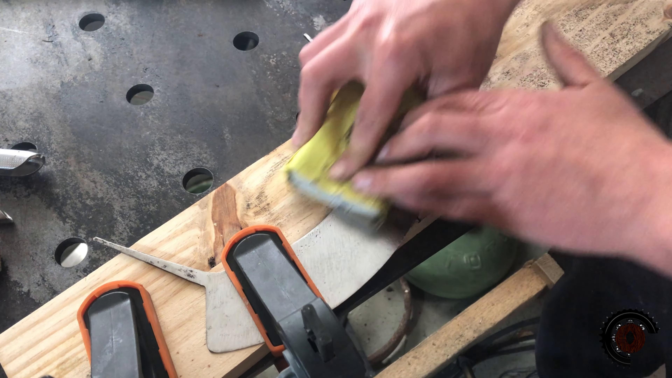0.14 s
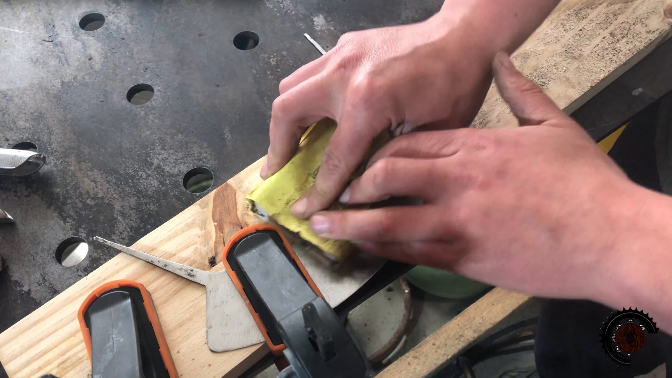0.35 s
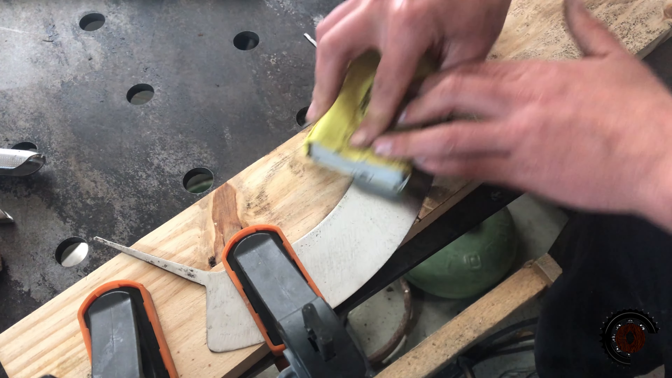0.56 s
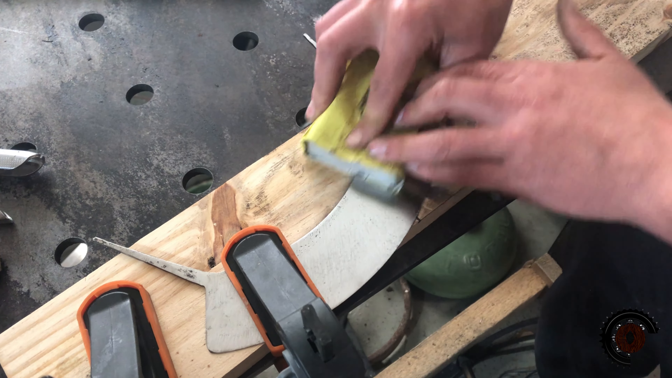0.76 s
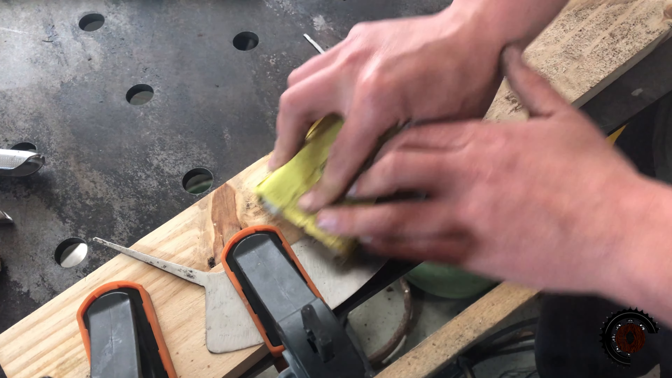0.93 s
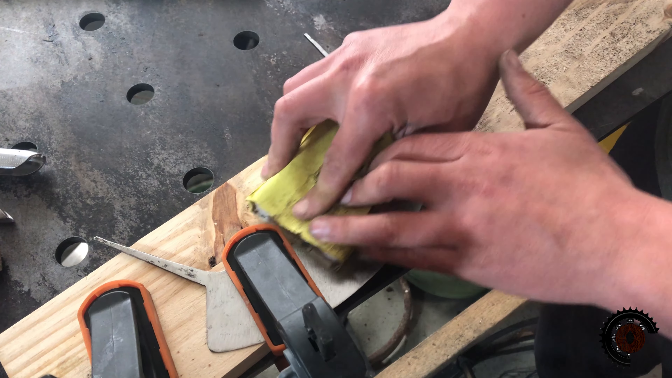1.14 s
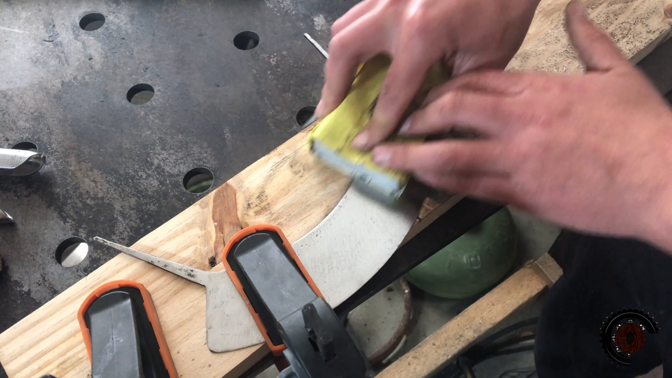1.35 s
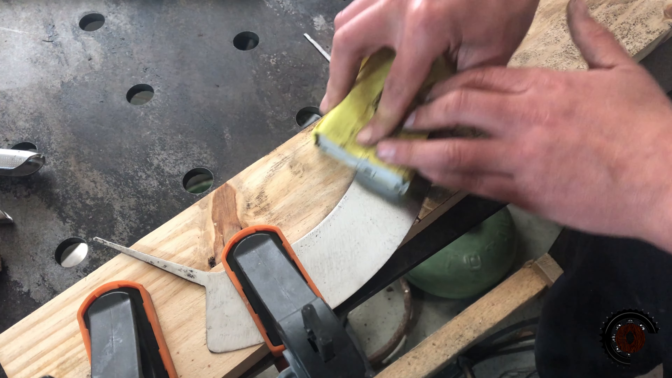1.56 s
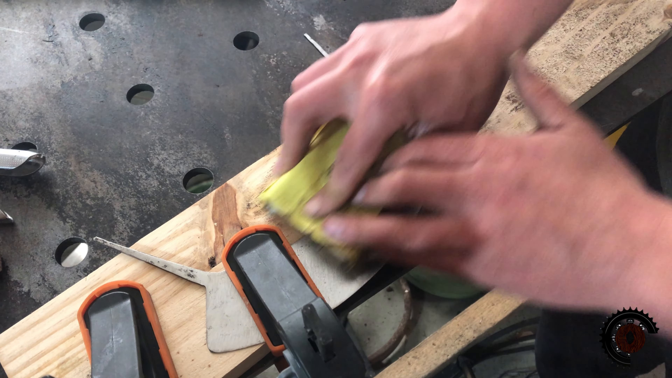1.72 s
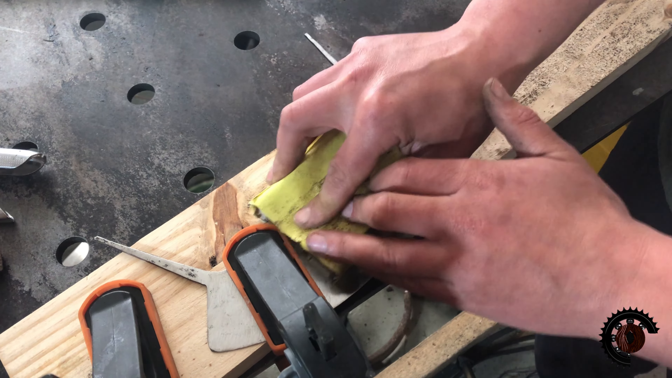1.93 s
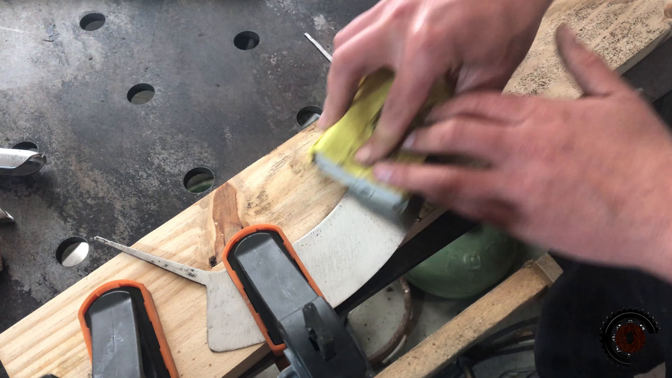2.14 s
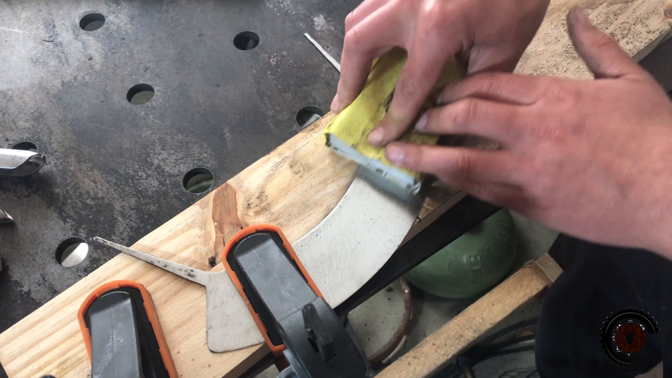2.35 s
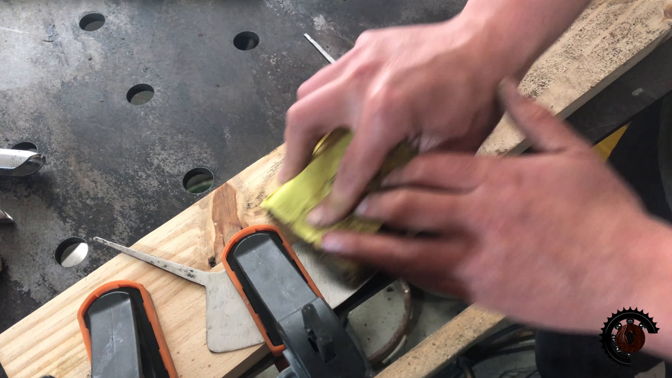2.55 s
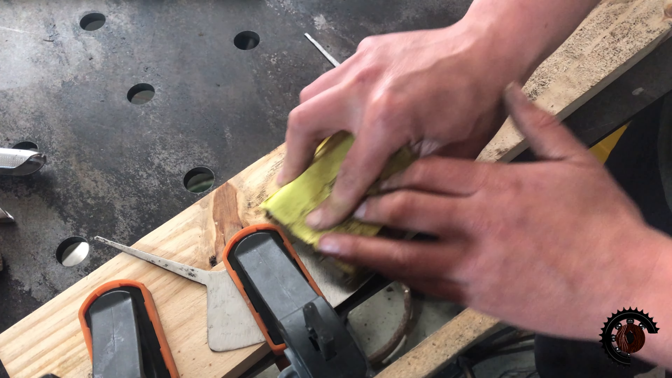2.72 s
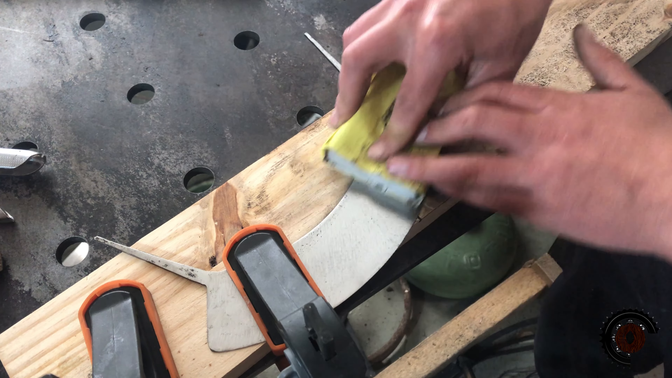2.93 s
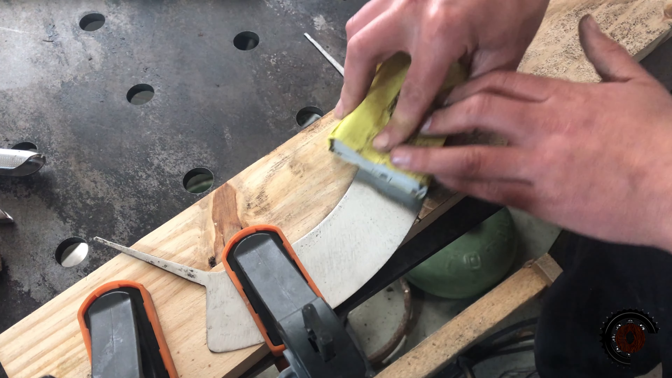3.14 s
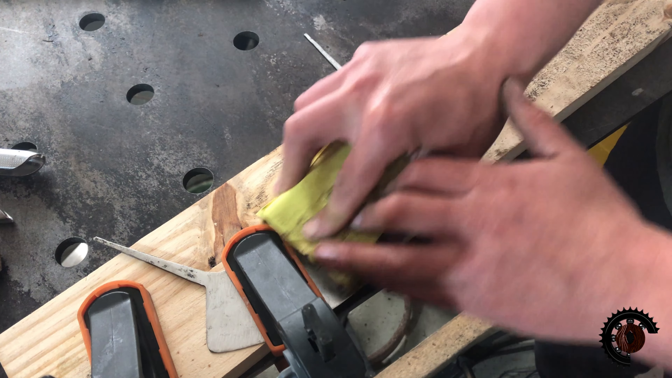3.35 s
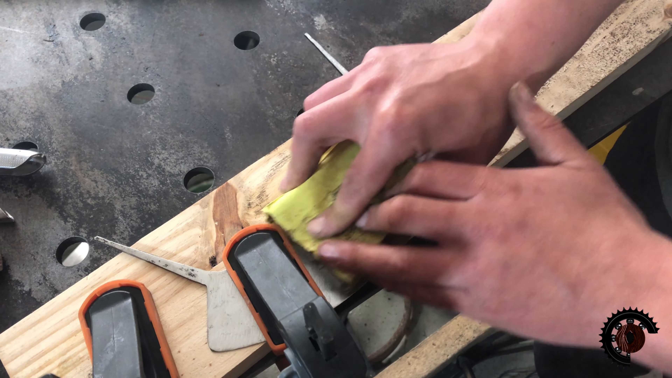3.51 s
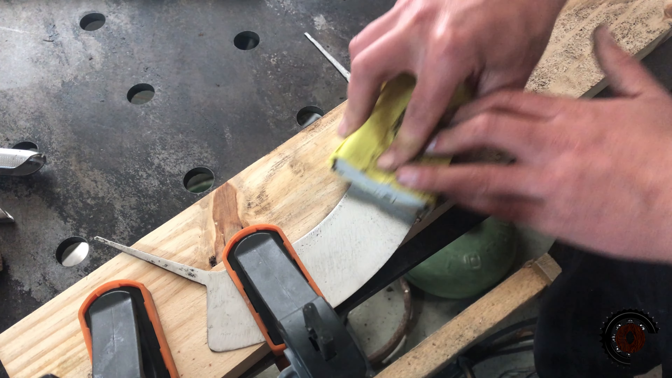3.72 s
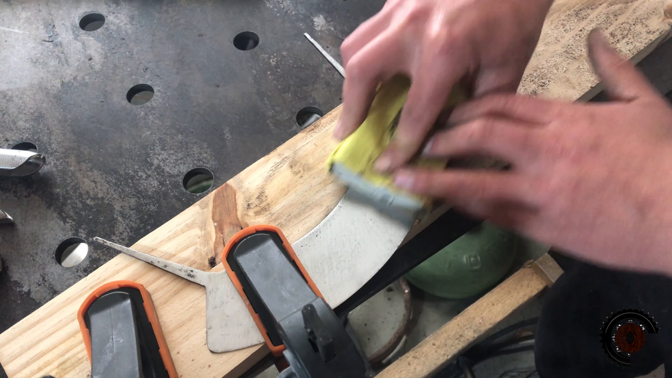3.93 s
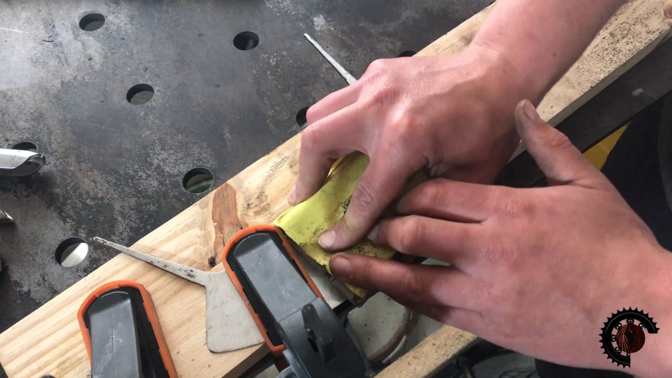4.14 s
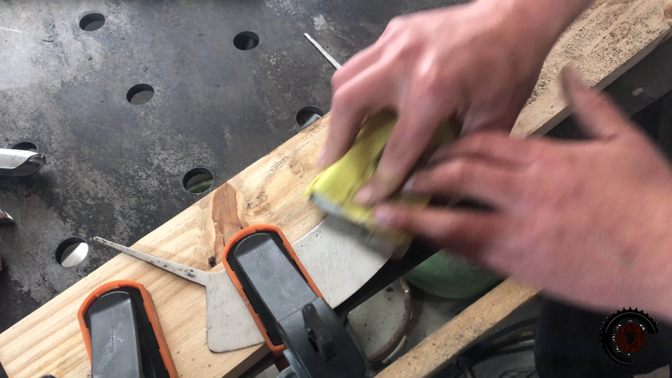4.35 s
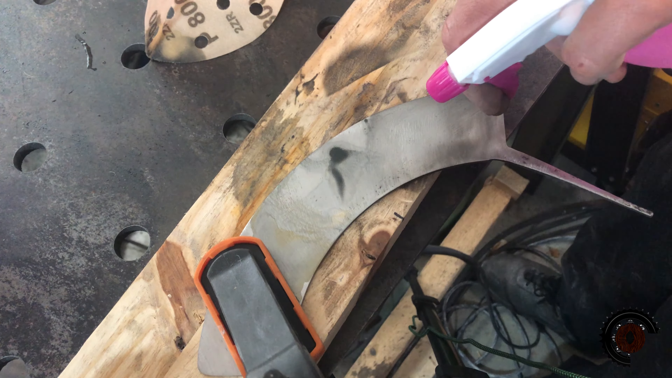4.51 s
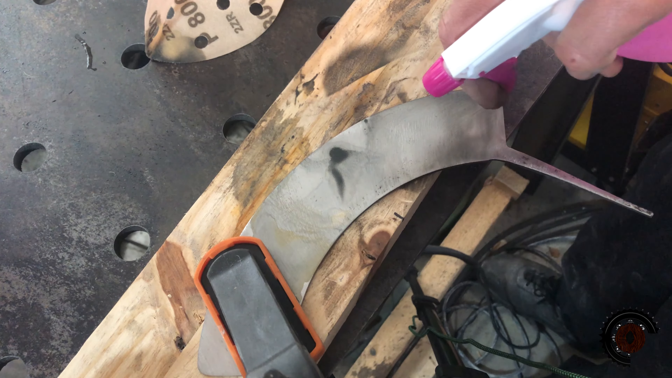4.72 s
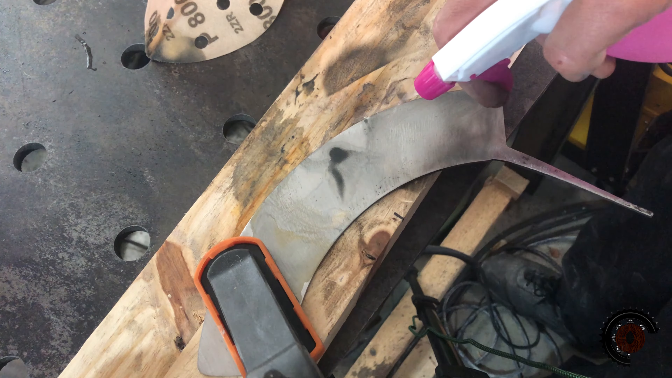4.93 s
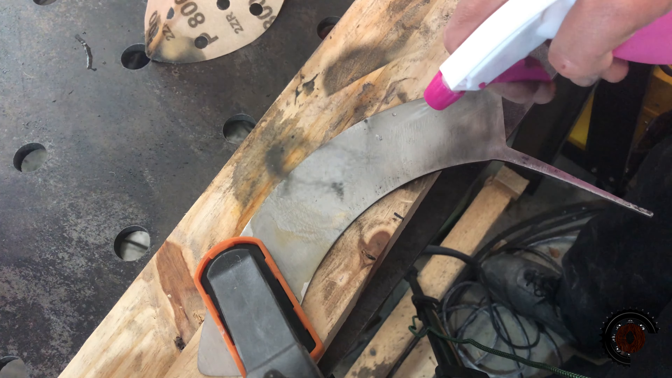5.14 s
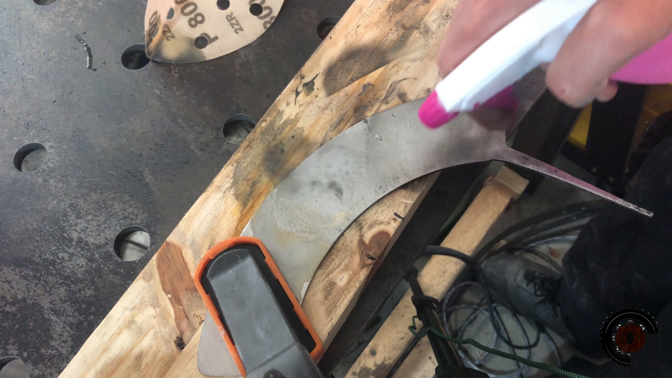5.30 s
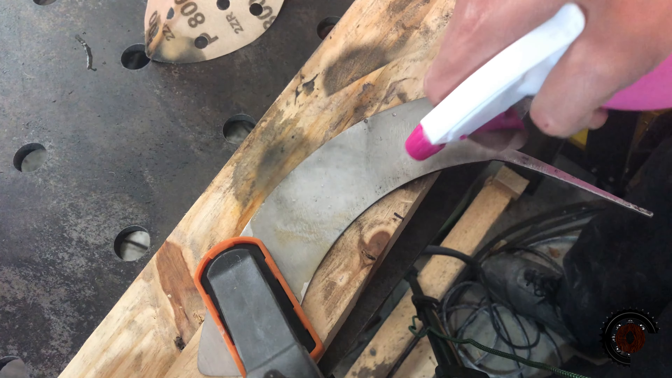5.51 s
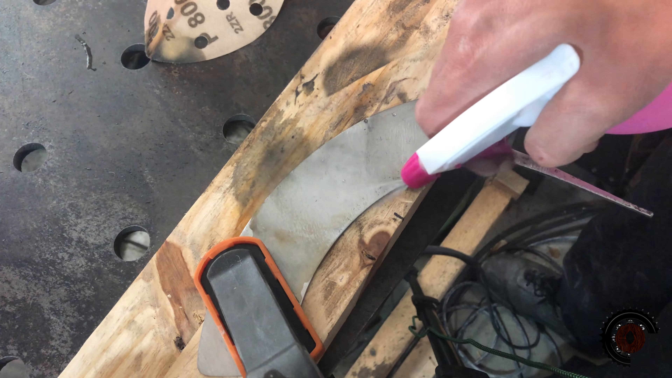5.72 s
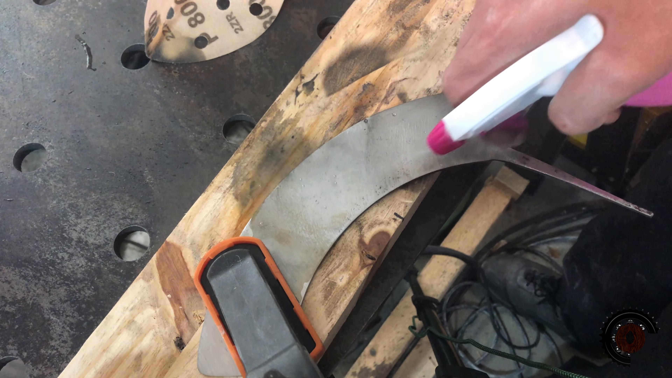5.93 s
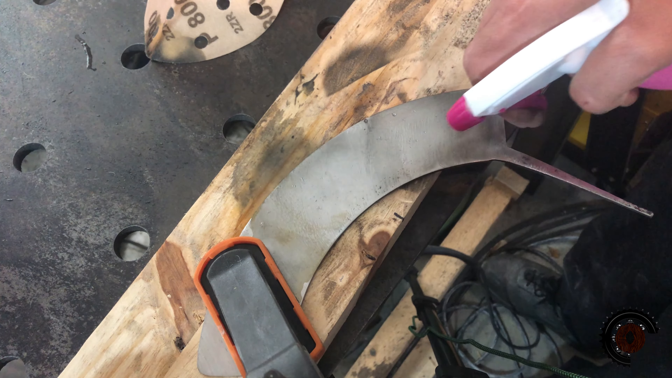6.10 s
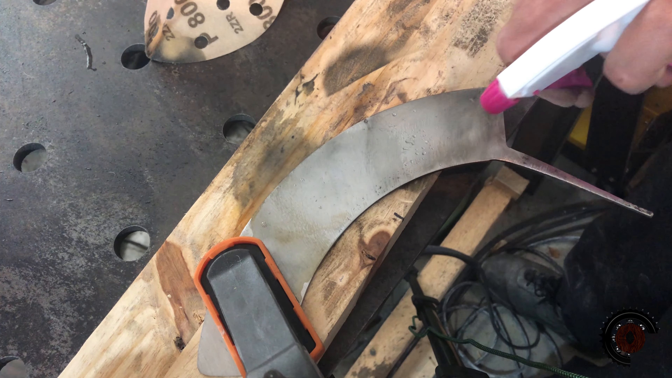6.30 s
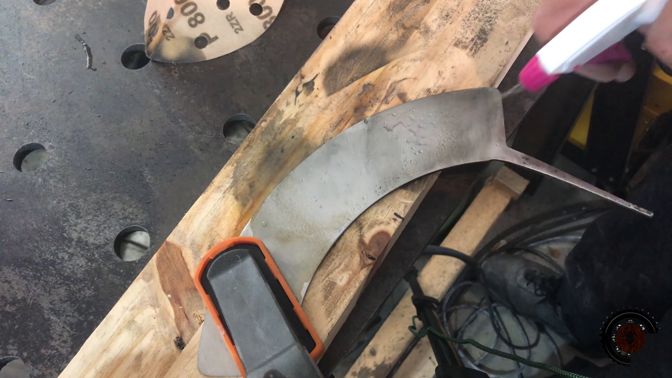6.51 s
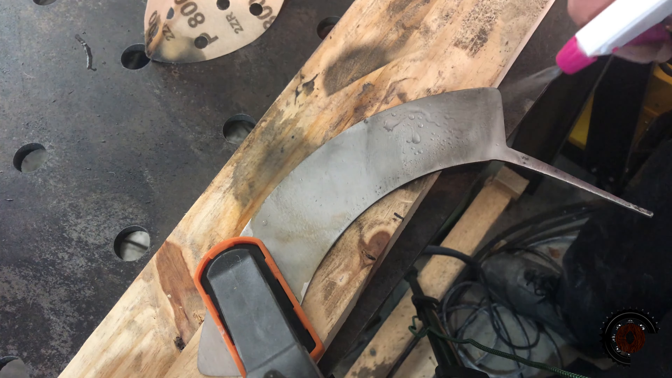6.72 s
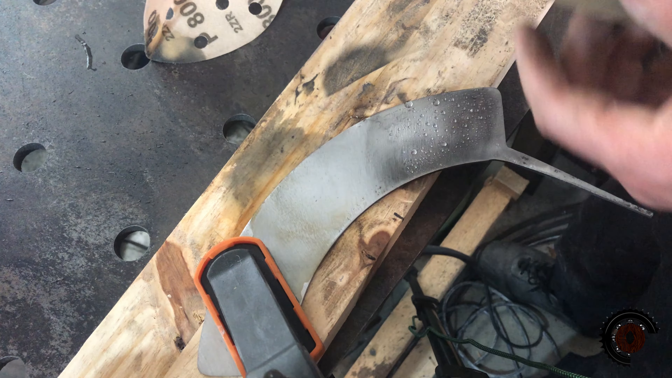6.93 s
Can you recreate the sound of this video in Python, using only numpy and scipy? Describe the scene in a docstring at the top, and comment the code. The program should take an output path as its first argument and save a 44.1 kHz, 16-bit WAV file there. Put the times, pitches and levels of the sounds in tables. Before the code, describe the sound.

Dry, harsh sanding on steel comes first: rasping strokes that bite, swell and ease off at every turn, with a thin blade ring and low board shudder. A sudden cut leaves a short hush. Then quieter spraying: a small squeak and gurgle as the pump primes, then regular trigger snaps, brief hisses, droplets pattering on metal and airy refills. Close microphone, small room reflections, faint hum and hiss.

```python
"""Sanding, then spraying a blade

A sponge scrubs a clamped steel blade: grit impacts hiss, ring the blade and shake the board, stroke by stroke.
The scene cuts to a quieter one where a trigger bottle sprays: noise jets hiss, clicks rattle, the bottle thumps,
and the pump squeaks, gurgles and wheezes. Short reflections, a faint shop hum and microphone hiss lie around it."""
import sys
import numpy as np
from scipy import signal
from scipy.fft import rfft, irfft, next_fast_len
from scipy.io import wavfile
from scipy.ndimage import uniform_filter1d

SR = 44100
rng = np.random.default_rng(int(sys.argv[2]) if len(sys.argv) > 2 else 0)


def generate_wav(sig):
    """Save sig (samples, or channels by samples) to the path in sys.argv[1] as 16-bit PCM at SR."""
    pcm = np.round(np.clip(np.atleast_2d(sig).T, -1, 1) * 32767).astype(np.int16)
    wavfile.write(sys.argv[1], SR, pcm)


N = 306933


def from_db(db):
    """Gain of a level in dB."""
    return 10 ** (np.asarray(db) / 20)


def rms_one(x):
    """Scale to unit rms."""
    return x / np.sqrt(np.mean(x ** 2) + 1e-20)


def seconds():
    """Time of every sample."""
    return np.arange(N) / SR


def filtered(x, order, hz, kind="low"):
    """Butterworth filter."""
    return signal.sosfilt(signal.butter(order, hz, kind, fs=SR, output="sos"), x)


def level_curve(table):
    """Gain following a (time, dB) curve, silent outside its span with softened ends."""
    t, rows = seconds(), np.array(table)
    sounding = (t >= rows[0, 0]) & (t <= rows[-1, 0])
    gain = from_db(np.interp(t, rows[:, 0], rows[:, 1]))
    return uniform_filter1d(1. * sounding, size=130) * gain


def peaks_db(times, tops_db, rises, falls):
    """Loudest of several peaks, each climbing and falling evenly in dB per second."""
    t = seconds()
    peaks = np.broadcast(times, tops_db, rises, falls)
    return np.max([db - np.where(t < s, up * (s - t), down * (t - s)) for s, db, up, down in peaks], axis=0)


def coloured(x, spectrum):
    """Shape by a dB-per-Hz spectrum drawn on log frequency; rms 1."""
    size = next_fast_len(N)
    hz = np.arange(size // 2 + 1) * SR / size + 1
    points = np.array(spectrum)
    gain = from_db(np.interp(np.log(hz), np.log(points[:, 0]), points[:, 1]))
    return rms_one(irfft(rfft(x, size) * gain, size)[:N])


def resonance(x, hz, width_hz):
    """Two-pole peak whose gain on top is about 1."""
    r = np.exp(-np.pi * width_hz / SR)
    poles = [1, -2 * r * np.cos(2 * np.pi * hz / SR), r * r]
    return signal.lfilter((1 - r * r) / 2 * np.array([1, 0, -1]), poles, x)


def double_resonance(x, hz, width_hz):
    """The same peak passed twice, for steeper sides."""
    return resonance(resonance(x, hz, width_hz), hz, width_hz)


def body(x, modes, peak=resonance):
    """Resonances side by side, signs alternating."""
    return sum((-1) ** k * from_db(db) * peak(x, hz, width) for k, (hz, width, db) in enumerate(modes))


def grains(per_s, spread_db):
    """Random tiny impacts of uneven size; rms 1."""
    sizes = from_db(spread_db * np.minimum(rng.exponential(1, N), 5)) * rng.standard_normal(N)
    return rms_one(sizes * (rng.random(N) < per_s / SR))


def flutter(hz, depth_db):
    """Random wavering of level, no faster than about the given rate."""
    return from_db(depth_db * rms_one(filtered(rng.standard_normal(N), 2, hz)))


# Scratch spectra, main and finest: (frequency [Hz], level [dB per Hz])
GRIT_SPECTRUM = [(1760, -46), (3000, -5), (3820, -3), (4970, 2.5), (6410, 0), (8000, -4.5), (10400, -12.5),
                 (17600, -120)]
FINEST_SPECTRUM = [(6000, -36), (8000, -1.5), (10500, 3.5), (15000, 2), (17000, -7)]
# Blade and board modes, levels within each set: (frequency [Hz], width [Hz], level [dB])
BLADE_MODES = [(2090, 230, -1.5), (2480, 275, 5), (2724, 697, 1.5), (3256, 566, 1.5)]
BOARD_MODES = [(500, 65.5, -2), (681, 180, -4), (889, 117, -0.5), (1081, 120, -1), (1382, 243, -3),
               (1518, 60, -0.5), (1740, 230, -5.5)]
# Lasting rings of the steel, levels within the set: (frequency [Hz], width [Hz], level [dB])
STEEL_RINGS = [(492, 15, 5.5), (822, 20, 2.5), (920, 21, -1), (1000, 94, -1), (1123, 9.3, -3.5),
               (1377, 19, -10), (1767, 27, -1.5), (2270, 13, -9), (5186, 37, -6.5)]
# The bench groans when the hand leans on it: (time [s], level [dB])
LEANS = [(0.0, -52), (0.24, -65), (0.671, -52), (1.11, -64.5), (1.5, -60.5), (2.459, -64.5), (3.27, -66.5),
         (3.48, -70), (4.04, -73)]
# How finest hiss, blade and board shift re hiss: (per dB of slack [dB], mid-stroke toward the clamp [dB],
# mid-stroke toward the tip [dB], at the tip [dB], while biting [dB], while easing off [dB])
FINEST_SHIFTS = (-0.0839, 6, 5.5, -1, 1.2, -2)
BLADE_SHIFTS = (0.1157, -2, -0.8, 3.5, 1.5, -0.5)
BOARD_SHIFTS = (0.4116, -2.5, -0.56, 0, 1.5, -0.1)
FULL_DB = -38   # hiss of a full stroke; slack is how far below it the hiss lies
LEAN_BUILDS_DB_PER_S, LEAN_DIES_DB_PER_S, GROAN_RE_HISS_DB = 168, 135, -52
BENCH_DB, BENCH_FOLLOWS = -92, 0.17   # deep rumble at full stroke; share of the slack it loses


def sanding():
    """Thousands of grit tips scratch the steel; the force hisses, rings the blade and shakes the board."""
    hiss_db, colour_db, *motion = stroke_motion()
    hiss, slack_db = from_db(hiss_db), FULL_DB - hiss_db
    finest, blade_gain, board_gain = [
        from_db(db + sum(shift * amount for shift, amount in zip(shifts, [slack_db, *motion])))
        for db, shifts in zip(colour_db, (FINEST_SHIFTS, BLADE_SHIFTS, BOARD_SHIFTS))]
    force = grains(per_s=15000.0, spread_db=-0.5) * flutter(350.0, depth_db=0.6)
    blade = filtered(body(force, BLADE_MODES), 2, [1900, 3600], "band")
    board = filtered(body(force, BOARD_MODES), 4, [430, 1900], "band")
    scratch = hiss * (coloured(force, GRIT_SPECTRUM) + finest * coloured(force, FINEST_SPECTRUM))
    shaken = hiss * (blade_gain * rms_one(blade) + board_gain * rms_one(board))
    # narrow modes driven by the moving force outlast the turn of the stroke
    rings = from_db(7.0) * body(hiss * board_gain * force, STEEL_RINGS)
    rings += from_db(17.0) * resonance(hiss * force, 1572, 7)   # one mode sings on through the turns
    lean = from_db(peaks_db(*np.transpose(LEANS), LEAN_BUILDS_DB_PER_S, LEAN_DIES_DB_PER_S))
    groan = (lean + hiss * from_db(GROAN_RE_HISS_DB)) * rms_one(double_resonance(force, 401, 97))
    rumble = from_db(BENCH_DB - BENCH_FOLLOWS * slack_db) * rms_one(double_resonance(force, 100, 60))
    return patchy(scratch + shaken, depth=0.15) + rings + groan + rumble


# Sanding strokes, in turn toward the tip and back toward the clamp: (turn [s], time to bite [s],
# time to ease off [s], share of the bite that catches at once [0-1], hiss at the turn [dB],
# hiss once biting [dB], hiss before easing off [dB], then before the shifts: finest hiss re hiss [dB],
# blade ring re hiss [dB], board rumble re hiss [dB])
STROKE_TABLE = [(-0.25, .1, 0.061, .3, -65, -33, -40.5, -2.5, -0.023, 0.5),
                (0.109, 0.14, 0.065, 0.22, -64.5, -39, -39, -4.5, 0.46, 0),
                (0.432, 0.075, 0.079, .4, -62, -41.5, -40, -2, 0.53, -0.9),
                (0.784, 0.1, 0.078, 0.33, -68, -40.5, -40, -4.5, -0.52, -1),
                (1.179, 0.15, 0.077, 0.4, -65.5, -40, -43, -3, -0.28, -1.5),
                (1.592, 0.091, 0.11, 0.35, -72, -42, -36.5, -4, -0.99, -2),
                (1.992, 0.12, 0.058, 0.24, -73, -39, -45.5, -1.5, -0.56, -1),
                (2.398, 0.13, 0.076, 0.34, -68, -41.5, -38, -4, -0.77, -1.4),
                (2.778, 0.096, 0.073, 0.49, -63, -39, -45.5, -3, .8, -1.2),
                (3.181, 0.12, 0.081, 0.19, -69.5, -40, -38, -4, -0.23, -2.5),
                (3.557, .11, 0.056, 0.13, -68.5, -38.5, -44, -3, 1.3, -2.5),
                (3.953, 0.1, 0.087, 0.35, -64, -38.5, -36.5, -5, 0.83, -2),
                (4.301, 0.097, 0.046, 0.49, -62.5, -39.5, -36.5, -4, -0.73, -5)]
LAST_TURN_S = 4.7   # end of the last stroke
REST_S, CATCH_S = 0.012, 0.0064   # the sponge rests at the turn, then catches
BITE_CURVE, EASE_CURVE = 2.02, 0.8   # bite comes fast then levels off; easing is nearly even in dB
SWELL_DB = 1.5   # extra hiss in mid-stroke


def stroke_motion():
    """Hiss and colour in dB; mid-stroke toward clamp and tip, nearness to the tip, biting, easing (0-1)."""
    t, rows = seconds(), np.array(STROKE_TABLE)
    k = np.searchsorted(rows[:, 0], t) - 1
    start, bite_s, ease_s, catch, turn_db, early_db, late_db, *colour_db = rows[k].T
    end = np.append(rows[1:, 0], LAST_TURN_S)[k]
    next_db = np.append(rows[1:, 4], rows[-1, 4])[k]
    done = (t - start) / (end - start)
    since_rest = t - start - REST_S
    biting = np.clip(1 - since_rest / (bite_s - REST_S), 0, 1)
    loose = 1 - np.clip(catch, 0, 1) * np.clip(since_rest / CATCH_S, 0, 1)
    easing = np.clip(1 - (end - t) / ease_s, 0, 1)
    held = np.clip((t - start - bite_s) / (end - start - bite_s - ease_s), 0, 1)
    db = early_db + (late_db - early_db) * held + SWELL_DB * np.sin(np.pi * held)
    db -= (early_db - turn_db) * loose * biting ** BITE_CURVE
    db -= (late_db - next_db) * easing ** EASE_CURVE
    inward = k % 2   # odd strokes head for the clamp
    middle = np.sin(np.pi * done) ** 2
    travelled = (1 - np.cos(np.pi * done)) / 2
    near_tip = np.where(inward, 1 - travelled, travelled)
    bite, ease = 4 * biting * (1 - biting), 4 * easing * (1 - easing)   # each peaks halfway
    return db, colour_db, middle * inward, middle * (1 - inward), near_tip, bite, ease


def patchy(x, depth):
    """Worn and fresh patches of grit: narrow zones of colour swell and sink on their own."""
    zones = np.geomspace(600, 12000, num=16)
    return x + depth * sum(rms_one(filtered(rng.standard_normal(N), 2, 14)) * resonance(x, hz, hz / 6)
                           for hz in zones)


# Nozzle hiss and wet patter spectra: (frequency [Hz], level [dB per Hz])
JET_SPECTRUM = [(1120, -44), (1800, -25), (2000, -7.5), (2820, -6.5), (3970, -6), (5220, -2.5), (6160, -5),
                (7220, 0), (9500, -5), (12000, -11)]
SPLASH_SPECTRUM = [(400, -62), (650, -22), (900, -10.5), (1900, -7), (2500, -20)]
SPLASH_DEEP_HZ = 1150   # top of the patter's deep part


def jet():
    """Nozzle hiss with spitting droplets; the drops patter lower on the wet blade."""
    hiss, fine, splash, deep = jet_flow()
    air = rng.standard_normal(N) * flutter(180.0, depth_db=-3.0)
    drops = resonance(grains(per_s=900.0, spread_db=2.0), 8000, 4000)
    mist = filtered(air[::-1], 4, 10000, "high")   # reversed, so it differs from the hiss
    patter = coloured(grains(per_s=4900.0, spread_db=2.0), SPLASH_SPECTRUM) * flutter(40.0, depth_db=0.5)
    deep_band = signal.butter(3, SPLASH_DEEP_HZ, fs=SR, output="sos")
    patter = patter + (deep - 1) * signal.sosfiltfilt(deep_band, patter)
    whistle = body(rng.standard_normal(N) * flutter(12.0, depth_db=6.0), [(6500, 120, 0), (7300, 200, 3)])
    spit = coloured(air, JET_SPECTRUM) + from_db(-8.0) * rms_one(drops) + from_db(-15.0) * rms_one(whistle)
    return flutter(36.0, depth_db=1.0) * (hiss * spit + splash * patter + fine * rms_one(mist))


# Jets: (start [s], swells for [s], sags for [s], first hiss [dB], top hiss [dB], splash before rounding [dB],
# gain of its deep part [dB], most mist [dB])
JET_TABLE = [(5.044, 0.032, 0.027, -60, -42, -85, -3, -35), (5.1, 0.12, 0.041, -47, -43.5, -50.5, -1, -51),
             (5.48, 0.047, 0.054, -51, -43.5, -51, -1, -45),
             (5.765, 0.062, 0.048, -50, -42.5, -45.5, 3.5, -43),
             (6.035, 0.052, 0.043, -47.5, -44.5, -52, 0, -45),
             (6.28, 0.047, 0.035, -47, -44.5, -57, 0, -47.5),
             (6.515, 0.061, 0.033, -48.5, -44.5, -52.5, -20, -47.5),
             (6.749, 0.061, 0.032, -51, -44.5, -54, -5, -49)]
SAG_DB, COLLAPSE_DB_PER_S = 3, 557
SPLASH_BUILDS_DB, SPLASH_DIES_DB_PER_S = 23, 283   # gained over the swell, lost after the top
SPLASH_ROUNDS_S = 0.026   # the top of each splash is blunt
MIST_LEAD_DB = 2.5   # weak flow is mostly mist, up to this much over the hiss


def jet_flow():
    """Each jet swells, sags and collapses; its mist holds under a ceiling; its splash peaks with the flow."""
    t, hiss, mist = seconds(), np.zeros(N), np.zeros(N)
    start, swell_s, sag_s, first_db, top_db, splash_db, deep_db, mist_db = np.transpose(JET_TABLE)
    top = start + swell_s
    for s, peak, end, db0, db1, fine_db in zip(start, top, top + sag_s, first_db, top_db, mist_db):
        flow_db = np.interp(t, [s, peak, end], [db0, db1, db1 - SAG_DB])
        flow_db = flow_db - COLLAPSE_DB_PER_S * np.maximum(t - end, 0)
        flow = (t >= s) * from_db(flow_db)
        hiss = np.maximum(hiss, flow)
        mist = np.maximum(mist, np.minimum(flow * from_db(MIST_LEAD_DB), from_db(fine_db)))
    patter_db = peaks_db(top, splash_db, SPLASH_BUILDS_DB / swell_s, SPLASH_DIES_DB_PER_S)
    splash = from_db(uniform_filter1d(patter_db, size=round(SPLASH_ROUNDS_S * SR)))
    deep = from_db(np.interp(t, top, deep_db))
    return uniform_filter1d(hiss, size=130), uniform_filter1d(mist, size=130), splash, deep


# Trigger clicks: (time [s], snap peak [dB], snap frequency [Hz], pump body re snap peak [dB])
CLICK_TABLE = [(4.949, -24.5, 8900, -15.5), (4.979, -38, 10200, -26), (5.3404, -40, 11500, -14),
               (5.3475, -37, 9600, -5.5), (5.361, -42, 10200, -3), (5.391, -48, 5000, -4),
               (5.401, -59, 5000, -7), (5.4643, -21, 9400, -20), (5.4704, -21, 9900, -19),
               (5.5029, -31, 7100, -24), (5.63, -45, 6000, -10), (5.637, -46, 9000, -15),
               (5.648, -39, 8000, -16), (5.6576, -29.5, 8950, -17.5), (5.752, -16.5, 8800, -23),
               (5.7566, -22.5, 9000, -16), (5.785, -26, 8100, -23), (5.9449, -40.5, 9050, -12),
               (6.014, -60, 8000, -15), (6.0269, -17.5, 7560, -23), (6.109, -28, 7700, -19),
               (6.1874, -42, 10300, -24), (6.1953, -35, 8800, -17), (6.27, -21, 10000, -15),
               (6.3385, -28, 7500, -26), (6.4254, -43, 10200, -16), (6.4334, -38, 8960, -17),
               (6.5051, -23, 8550, -14.5), (6.539, -28, 11400, -18), (6.6654, -49, 13700, -7.5),
               (6.674, -42, 10800, -18), (6.6796, -39, 8160, -12), (6.7407, -14.5, 11100, -24.5),
               (6.896, -49.5, 6420, 1), (6.9062, -36, 11200, -22), (6.9126, -37, 8400, -9)]
RATTLE_LEAD_S, RATTLE_T60_S = .001, .009   # faint lead-in, then decay from the blow


def trigger():
    """Each click is a rattle of a few milliseconds, through a bright snap and the pump body."""
    out, t = np.zeros(N + 2000), np.arange(2000) / SR
    shape = np.where(t < RATTLE_LEAD_S, .25, from_db(-60 * (t - RATTLE_LEAD_S) / RATTLE_T60_S))
    blow = 3.0 * (np.arange(2000) == round(RATTLE_LEAD_S * SR))
    noises = rng.standard_normal((len(CLICK_TABLE), 2000))
    for (s, peak_db, snap_hz, pump_db), noise in zip(CLICK_TABLE, noises):
        rattle = blow + noise * shape
        snap = double_resonance(rattle, snap_hz, 6500)
        rung = pump(rattle, count=5)
        click = snap / abs(snap).max() + from_db(pump_db) * rung / abs(rung).max()
        out[round(s * SR):][:2000] += from_db(peak_db) * click
    return out[:N]


# Thumps: a faint handling knock as the spraying scene opens, then the trigger biting or returning:
# (time [s], low mode level [dB], low mode [Hz], upper mode [Hz], upper re low [dB], neck mode [Hz],
# neck re low [dB])
THUMP_TABLE = [(4.549, -75, 230, 500, 3, 834, 0), (4.95, -72, 230, 700, 5, 1090, -3),
               (5.469, -47.5, 205, 336, -3.5, 1200, -21), (5.753, -46, 238, 426, 0.5, 960, -10),
               (6.03, -42, 364, 550, -0.5, 1410, -10), (6.27, -46, 353, 597, -1.5, 1300, -8),
               (6.505, -42, 380, 598, -2.5, 1320, -6.5), (6.665, -74.5, 362, 706, 8, 1300, 17),
               (6.743, -39.5, 394, 565, -2, 1366, -6), (6.9, -65, 298, 1000, 5, 1400, 8)]
THUMP_T60_S = .055
SLOSH_T60_S, SLOSH_DB = 0.29, -17.5   # decay and start of the noise that drives the slosh


def bottle():
    """The part-filled bottle knocks in a few damped modes that shift as it tilts; sloshing murmurs in them."""
    out, t = np.zeros(N + 12000), np.arange(12000) / SR
    swell = (1 - np.exp(-t / 0.0026)) * from_db(-60 * t / THUMP_T60_S)
    noise = rng.standard_normal((len(THUMP_TABLE), 12000)) * from_db(SLOSH_DB - 60 * t / SLOSH_T60_S)
    for (s, level_db, low_hz, upper_hz, upper_db, neck_hz, neck_db), slosh in zip(THUMP_TABLE, noise):
        modes = [(low_hz, 0), (0.846 * upper_hz, upper_db - 4.5), (upper_hz, upper_db), (neck_hz, neck_db)]
        knock = np.zeros(12000)
        for hz, db in modes:
            murmur = 10 * double_resonance(slosh, hz, 130)
            knock += from_db(db) * (swell * np.sin(2 * np.pi * hz * t) + murmur)
        out[round(s * SR):][:12000] += from_db(level_db) * knock
    return filtered(out[:N], 3, 150, "high")


# Wheezes as the pump primes and after each release: (time [s], peak [dB], decay by 60 dB [s])
WHEEZES = [(4.94, -80, .02), (4.957, -61, 0.08), (4.981, -52, 0.1), (5.347, -55, 0.43),
           (5.659, -52.5, 0.064), (5.947, -50.5, .065), (6.195, -52.5, 0.068), (6.433, -53, 0.11),
           (6.68, -63, 0.23), (6.909, -61, 0.27)]
# Air bubbles through the valve at the first jet: (time [s], level [dB])
GURGLE_CURVE = [(5.045, -83), (5.057, -79), (5.077, -49.5), (5.13, -81)]
# The dry piston squeaks around the start of the first jet: (time [s], slips per second [Hz], level [dB])
SQUEAKS = [
    [(5.0, 496, -80), (5.015, 500, -71), (5.04, 512, -67), (5.055, 545, -60), (5.07, 590, -66)],
]
WHEEZE_RISES_DB_PER_S, WHEEZE_LASTS_S = 1100, 0.059   # shut off this long after the peak


def refill():
    """Air and liquid drawn through the valve sound the pump's cavities; a dry piston slips in a squeak."""
    s, peak_db, t60 = np.transpose(WHEEZES)
    latest = np.maximum(np.searchsorted(s - WHEEZE_LASTS_S / 2, seconds()) - 1, 0)
    is_open = uniform_filter1d(1. * (seconds() - s[latest] < WHEEZE_LASTS_S), size=400)
    drawn = from_db(peaks_db(s, peak_db, WHEEZE_RISES_DB_PER_S, 60 / t60)) * is_open
    wheeze = drawn * rms_one(pump(grains(per_s=8000.0, spread_db=2.0) * flutter(90.0, depth_db=2.0)))
    bubbles = resonance(resonance(rng.standard_normal(N), 2093, 200), 2180, 200)
    gurgle = level_curve(GURGLE_CURVE) * rms_one(bubbles)
    rows = np.array(SQUEAKS)[0]
    phase = 2 * np.pi * np.cumsum(np.interp(seconds(), rows[:, 0], rows[:, 1])) / SR
    slips = sum(np.cos(k * phase) for k in range(5, 26))   # sharp slips: a long row of overtones
    squeak = level_curve(rows[:, [0, 2]]) * rms_one(double_resonance(slips, 5500, 6000))
    return wheeze + gurgle + squeak


# Pump cavities: (frequency [Hz], width of each of two passes [Hz], level [dB])
PUMP_MODES = [(2086, 320, 3), (2650, 460, -3), (3430, 550, -4), (4460, 180, -2.5), (4840, 61, 0),
              (5600, 440, 0.5), (6470, 1800, -1), (7650, 3500, -5), (10200, 3900, -1), (13500, 4500, -7)]


def pump(x, count=None):
    """The pump's cavities: sharp-edged resonances with dark gaps, nothing low."""
    return filtered(body(x, PUMP_MODES[:count], double_resonance), 4, 1850, "high")


ROOM_T60_S, ROOM_DB = 0.16, -14   # decay; tail re direct sound


def workshop(x):
    """Direct sound plus a short, dull tail of dense reflections."""
    t = np.arange(SR // 3) / SR
    dull = signal.lfilter([.5], [1, -.5], rng.standard_normal(len(t)))
    tail = dull * from_db(-60 * t / ROOM_T60_S) * (t > .004)
    return x + from_db(ROOM_DB) * signal.fftconvolve(x, tail / np.sqrt(np.sum(tail ** 2)))[:N]


# Spectrum of the shop hum: (frequency [Hz], level [dB per Hz])
SHOP_SPECTRUM = [(20, -13.5), (48, -0.5), (70, -24), (150, -2.5), (400, -6.5), (800, -14.5), (1300, -24.5),
                 (4000, -23), (16000, -40.5)]
# Level before its flutter: hum, a silent gap at the cut, a brief handling bump, hum again: (time [s], level [dB])
SHOP_LEVEL = [(0, -81.5), (4.49, -87), (4.52, -120), (4.54, -120), (4.56, -72), (4.61, -100), (4.9, -95),
              (5.1, -89.5), (6.96, -86.5)]


def shop_hum():
    """Low wavering noise: shop hum, a silent gap at the cut, a brief handling bump, then hum again."""
    level = from_db(np.interp(seconds(), *np.transpose(SHOP_LEVEL)))
    return level * coloured(rng.standard_normal(N), SHOP_SPECTRUM) * flutter(50.0, depth_db=3.0)


# Microphone hiss spectrum: (frequency [Hz], level [dB per Hz])
MIC_SPECTRUM = [(1500, -44), (2000, 13), (4200, -5), (7000, 6), (16000, -2)]
MIC_HISS_DB, MIC_OPENS_S = -79, 4.92


def mic_hiss():
    """Thin steady noise that fades in over 27 ms in the spraying scene."""
    opened = np.clip((seconds() - MIC_OPENS_S) / 0.027, 0, 1)
    return from_db(MIC_HISS_DB) * opened * coloured(rng.standard_normal(N), MIC_SPECTRUM)


SCENE_CUT_S = 4.4975
CUT_DROP_DB, CUT_S, CUT_TRAILS_DB_PER_S = 24, .003, 1100   # quick drop over CUT_S, on top of a steady trail


def scene():
    """Sanding until the cut, spraying after it, over faint hum and a handling bump; both channels alike."""
    after = np.maximum(seconds() - SCENE_CUT_S, 0)
    fade = from_db(-CUT_DROP_DB * np.minimum(after / CUT_S, 1) - CUT_TRAILS_DB_PER_S * after)
    hum = shop_hum()
    spraying = jet() + refill() + trigger() + bottle()
    mono = fade * workshop(sanding()) + workshop(spraying) + hum
    return np.array([mono, mono])


CUTOFF_HZ = 15850


def record(dry):
    """Add the microphone hiss, then cut the top of the band steeply."""
    steep = signal.ellip(12, .5, 70, CUTOFF_HZ, fs=SR, output="sos")
    return signal.sosfilt(steep, dry + mic_hiss())


dry = scene()
out = record(dry)
generate_wav(out)
```